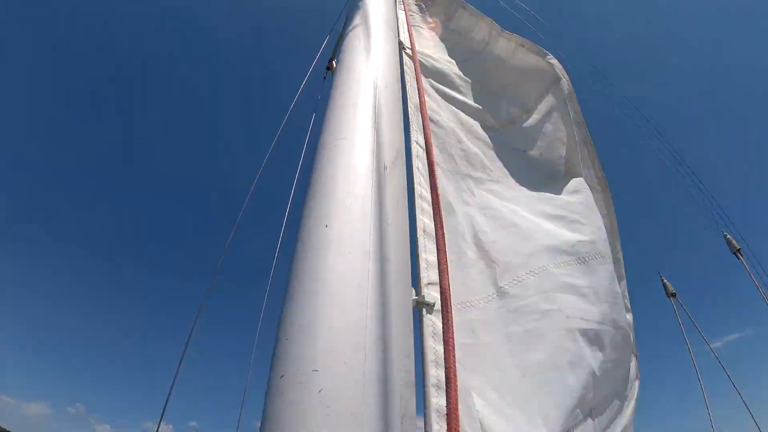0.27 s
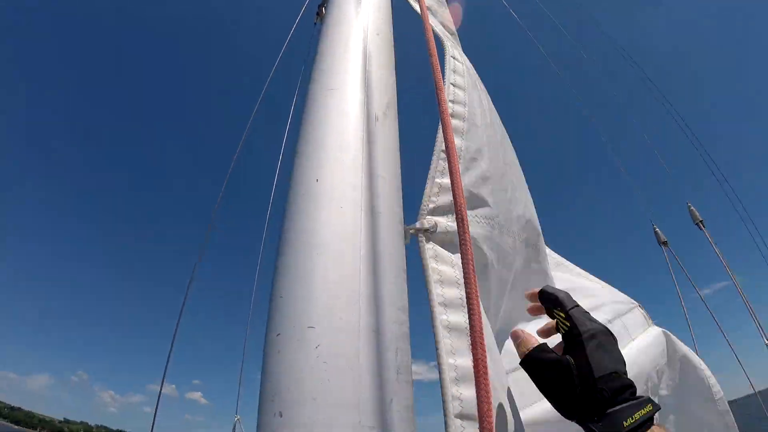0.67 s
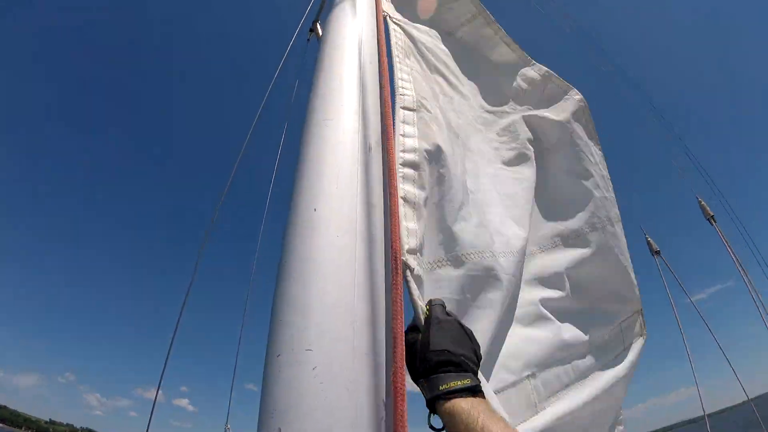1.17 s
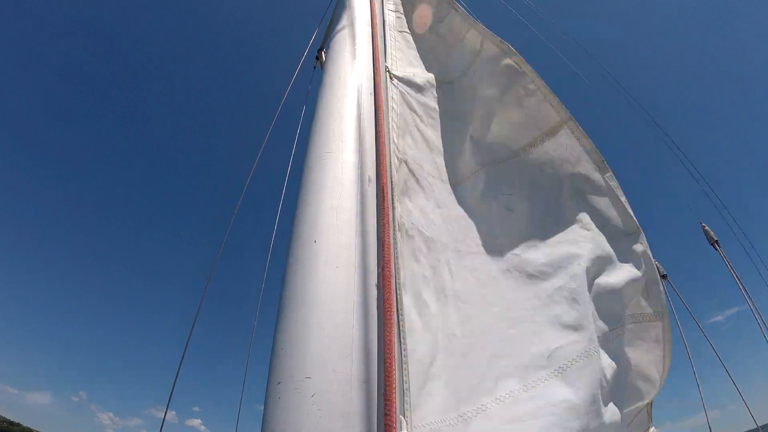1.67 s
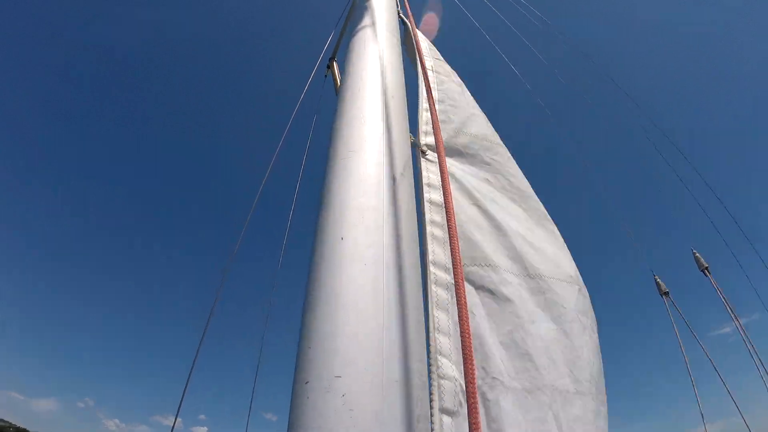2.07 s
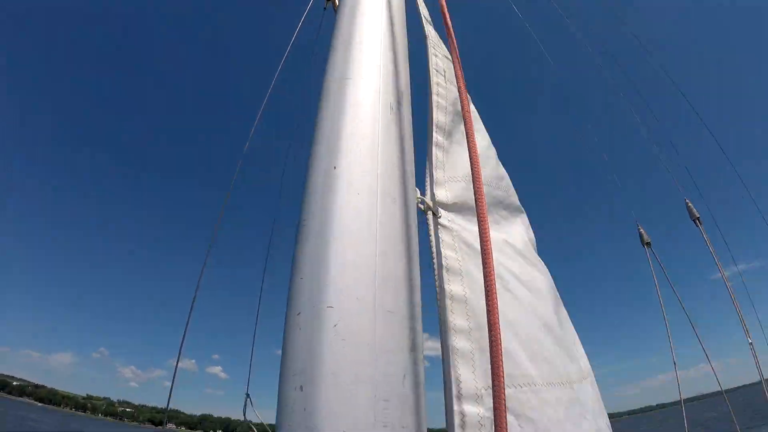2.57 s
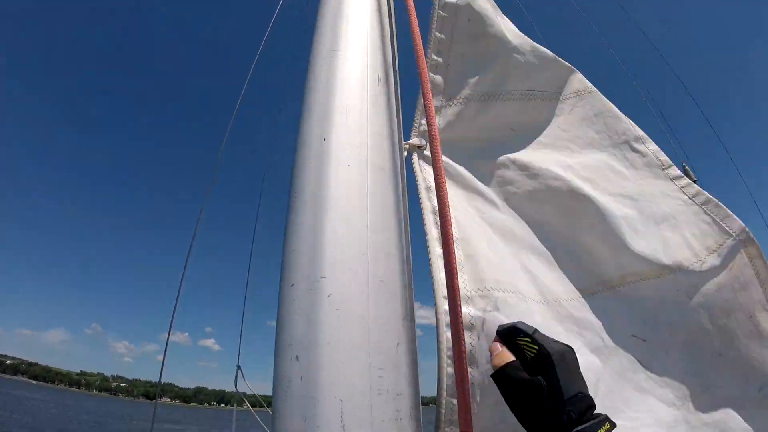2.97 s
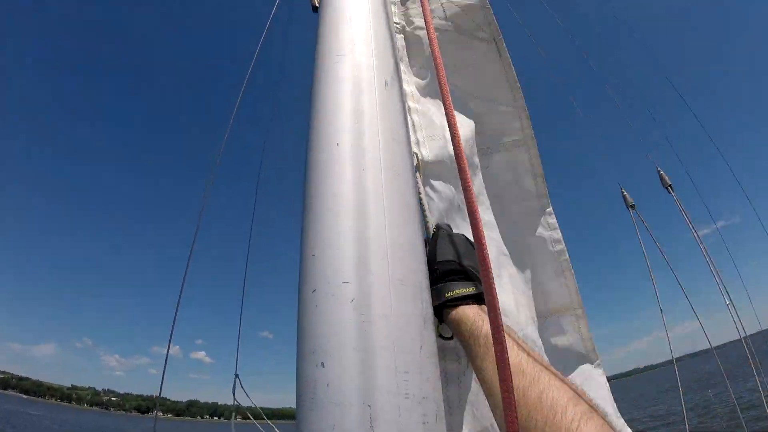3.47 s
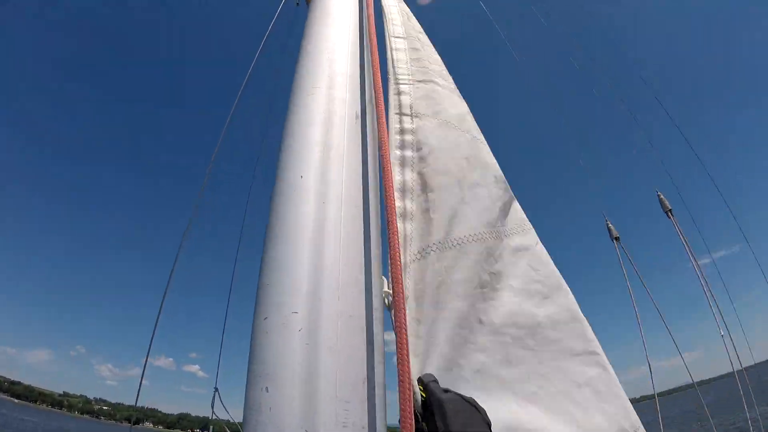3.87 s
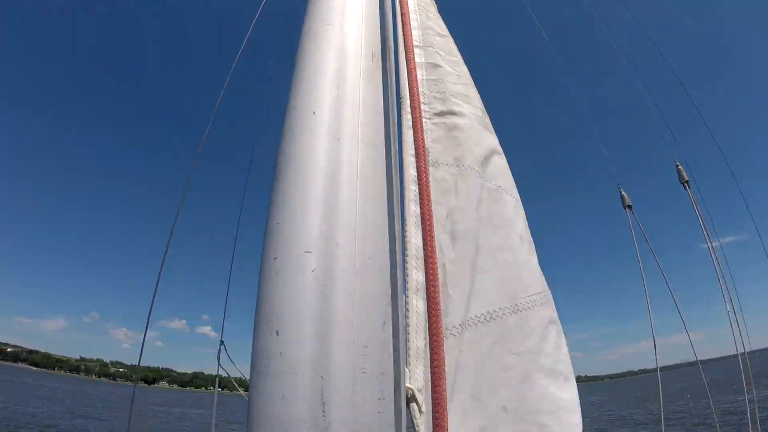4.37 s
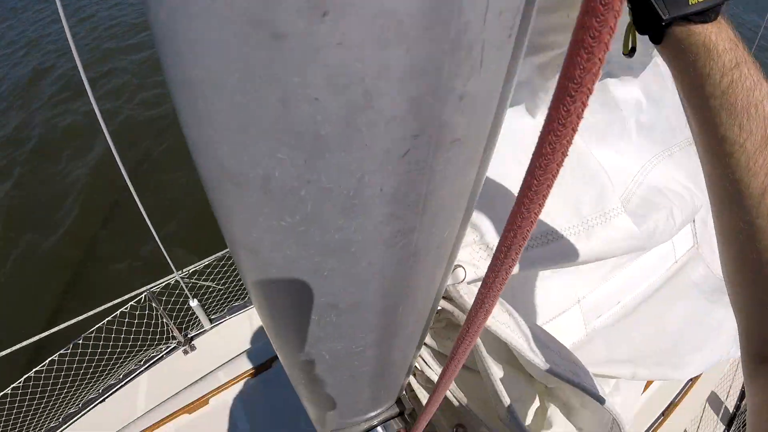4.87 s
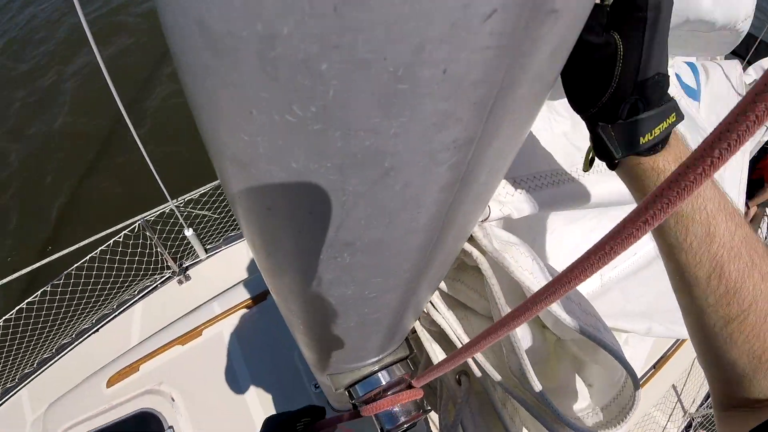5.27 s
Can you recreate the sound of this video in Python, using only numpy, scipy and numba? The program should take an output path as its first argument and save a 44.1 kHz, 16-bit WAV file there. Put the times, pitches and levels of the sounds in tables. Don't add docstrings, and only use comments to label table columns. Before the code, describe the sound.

Close outdoor sound at a mast on open water: low wind rumble with dull buffets while a loose sail snaps, rustles and hisses. Slides knock the hollow metal mast, ringing briefly. Flapping is dense at first, sparser midway, busy again around four seconds, then fades as wind strikes the microphone with rough, tearing pops.

```python
import sys
import numpy as np
from scipy import signal
from scipy.fft import rfft, irfft
from scipy.io import wavfile
from scipy.ndimage import uniform_filter1d
from numba import njit

SR = 44100
rng = np.random.default_rng(int(sys.argv[2]) if len(sys.argv) > 2 else 0)


def store_wav(level_fs):
    pcm = np.round(np.clip(np.atleast_2d(level_fs), -1, 1) * 32767)
    wavfile.write(sys.argv[1], SR, pcm.T.astype(np.int16))


def gain_from_db(level_db):
    decades = np.asarray(level_db, float) / 20
    return 10 ** decades


N = 244314


def unit(x):
    return x / np.sqrt(np.mean(x ** 2))


def peak_unit(x):
    return x / np.abs(x).max()


def curves(table):
    s, *columns = np.transpose(table)
    return [np.interp(np.arange(N) / SR, s, c) for c in columns]


def coloured(points, size=N):
    hz, db = np.transpose(points)
    bin_hz = np.fft.rfftfreq(size, 1 / SR)
    gain = gain_from_db(np.interp(np.log(bin_hz + 1), np.log(hz), db))
    return unit(irfft(rfft(rng.standard_normal(size)) * gain, size))


@njit
def svf(x, hz, width_hz):
    y, b, l = np.empty(len(x)), 0., 0.
    for i in range(len(x)):
        g, k = np.tan(np.pi * hz[i] / SR), width_hz[i] / hz[i]
        v = (b + g * (x[i] - l)) / (1 + g * (g + k))
        b, l, y[i] = 2 * v - b, l + 2 * g * v, k * v
    return y


def band(x, hz, width_hz):
    one = np.ones(len(x))
    return svf(x, np.clip(hz * one, 20, .45 * SR), np.maximum(width_hz * one, 1))


def dull(x, top_hz):
    return signal.sosfilt(signal.butter(4, top_hz, fs=SR, output="sos"), x)


@njit
def follow(x, rise, fall):
    y, e = np.empty(len(x)), .3
    for i in range(len(x)):
        e += (abs(x[i]) - e) * (rise if abs(x[i]) > e else fall)
        y[i] = e
    return y


def walk(rate_hz):
    k = int(SR / rate_hz)
    held = np.repeat(rng.standard_normal(N // k + 1), k)
    return unit(uniform_filter1d(uniform_filter1d(held, k), k)[:N])


def wavering(shape, smooth):
    return unit(uniform_filter1d(rng.standard_normal(shape), size=smooth))


def crackle(rate_hz, spread_db, tail_s):
    tick_db = spread_db * np.minimum(rng.exponential(size=N), 3)
    ticks = (rng.random(N) < rate_hz / SR) * gain_from_db(2 * tick_db)
    power = signal.lfilter([1], [1, -np.exp(-1 / (tail_s * SR))], ticks)
    return unit(np.sqrt(power + 1e-9))


def air_burst(size, rise_s, fall_s):
    t = np.arange(size) / SR
    return rng.standard_normal(size) * (1 - np.exp(-t / rise_s)) * np.exp(-t / fall_s)


def add(out, s, sound):
    i = int(s * SR)
    out[i:i + len(sound)] += sound[:N - i]


# start_s, big_eddies_db, small_eddies_db
WIND = [(0.0, -10.5, -28), (0.49, -9.5, -28), (0.89, -8.5, -24.5), (1.09, -9.5, -33), (1.57, -12, -31.5),
        (1.77, -3.5, -19), (2.1, -13.5, -32.5), (2.44, -9, -27.5), (2.61, -11, -39), (2.76, -13.5, -30.5),
        (2.96, -13, -31.5), (3.12, -11.5, -30.5), (4.0, -7, -30.5), (4.46, -8.5, -31), (4.84, -9, -29),
        (4.99, -10.5, -30.5), (5.12, -7, -26), (5.54, -11.5, -17.5)]
# freq_hz, density_db_per_hz
RUMBLE = [(8.8, -27.5), (15, -4.5), (43, 1.5), (113, 3.5), (376, -18), (438, -27), (607, -30), (661, -40),
          (900, -64), (1170, -53), (1980, -120)]


def wind():
    rumble_db, eddy_db = curves(WIND)
    swell_db = 1.2 * walk(14)
    flutter = rng.standard_normal(N) * gain_from_db(2.1 * walk(70) + swell_db) * crackle(330, 5.0, 0.013)
    eddies = unit(band(band(flutter, 510, 860), 530, 590))
    return coloured(RUMBLE) * gain_from_db(rumble_db) + eddies * gain_from_db(eddy_db - 4.0)


# start_s, peak_db, centre_hz
PUFFS = [(0.115, -28, 603), (0.28, -18.5, 530), (0.412, -27, 450), (0.918, -22, 423), (1.025, -32, 423),
         (1.44, -23, 493), (1.524, -15, 517), (1.627, -25, 474), (2.038, -28, 533), (2.176, -19, 503),
         (2.43, -16, 565), (2.66, -16, 614), (2.692, -10.5, 734), (2.892, -17, 440), (3.044, -24, 463),
         (3.087, -16, 703), (3.333, -27, 484), (3.453, -12, 428), (3.515, -10.5, 498), (3.579, -28, 509),
         (3.708, -31, 423), (4.244, -19, 436), (4.45, -20, 528), (4.488, -18, 471), (4.628, -16, 423),
         (4.944, -4.5, 686), (5.034, -8, 630), (5.058, -19, 423), (5.14, 2, 433), (5.23, -14, 450)]


def puffs():
    out = np.zeros(N)
    for s, db, hz in PUFFS:
        air = air_burst(2048, rise_s=0.0011, fall_s=0.0071)
        puff = band(band(air, hz, 0.62 * hz), hz, 0.62 * hz)
        add(out, s, gain_from_db(db - 4.5) * peak_unit(puff))
    return out


# start_s, peak_db, upper_part_re_peak_db
BUFFETS = [(0.024, -33, -22), (0.476, -12, -28), (0.673, -15, -4), (0.73, -11.5, -25), (1.07, -11, -14),
           (1.66, -6, -10.5), (2.15, -21, -11), (2.324, -20.5, 17), (2.428, -13.5, -22), (2.693, -13, -21),
           (2.725, -15.5, -17), (2.941, -10, -11), (2.996, -14, -32), (3.085, -15.5, -9),
           (3.139, -13, -8.5), (3.157, -9, -23), (3.394, -8.5, -17), (3.862, -12, -12), (4.022, -34, -19),
           (4.142, -4.5, -6.5), (4.353, -15, -8), (4.513, -5.5, -24), (4.662, -30, 4), (4.776, -6, -23),
           (4.829, -13, -19), (4.86, -2.5, -20.5), (4.905, -10, -14), (4.945, -4, -20.5),
           (5.019, -8.5, -12.5), (5.11, -9.5, 8)]


def buffets():
    out = np.zeros(N)
    for s, db, bright_db in BUFFETS:
        air = air_burst(2048, rise_s=0.0016, fall_s=0.012)
        low = unit(dull(band(air, 262, 200), 785))
        upper = unit(dull(band(air, 1300, 920), 1800))
        add(out, s, gain_from_db(min(db, -4)) * peak_unit(low + gain_from_db(bright_db) * upper))
    return out


# start_s, peak_db, treble_re_peak_db
POPS = [(5.1, -34, -7), (5.141, -30, -23), (5.16, -5, -12), (5.18, -18, -11), (5.222, -8.5, -8),
        (5.26, -11, -9), (5.2797, -4.5, -9), (5.292, -5, -33), (5.3425, -12, -16), (5.3627, -19, -17),
        (5.4214, -12, -30), (5.469, -11.5, -6), (5.489, -13, -19)]


def pops():
    out, t = np.zeros(N), np.arange(2048) / SR
    for s, db, treble_db in POPS:
        air = rng.standard_normal(len(t)) * np.exp(-t / 0.0051)
        low = unit(band(band(air, 1320, 1000), 1320, 970))
        treble = unit(band(air, 4700, 3000))
        add(out, s, gain_from_db(db) * peak_unit(low + gain_from_db(treble_db) * treble))
    return out


# start_s, strength_db, sharpness_db
GUST = [
    (5.03, -30, -9),
    (5.09, -20.5, -19),
    (5.15, -14, -32),
    (5.232, -16.5, -11),
    (5.247, -38, 3),
    (5.262, -16, 3),
    (5.35, -24.5, 2),
    (5.45, -22, 4),
    (5.54, -29, 7),
]


def gust():
    low_db, bright_db = curves(GUST)
    facing = np.clip((np.arange(N) / SR - GUST[0][0]) / 0.0061, 0, 1)
    jolts = unit((rng.random(N) < 800 / SR) * np.clip(rng.laplace(size=N), -3.5, 3.5))
    ragged = .6 * rng.standard_normal(N) * crackle(450, 3, .0015)
    tearing = (jolts + ragged) * gain_from_db(low_db) * facing
    low = band(band(tearing, 280, 544), 280, 490)
    bright = band(band(tearing, 1150, 1320), 1550, 2900) * gain_from_db(bright_db)
    return gain_from_db(18) * low + gain_from_db(2) * bright


# start_s, centre_hz, level_db, width_hz
WHISTLE = [
    (4.3, 7700, -89, 2000),
    (4.42, 8200, -63, 2010),
    (4.6, 9300, -56, 1800),
    (4.8, 9800, -53, 1590),
    (4.95, 9800, -67, 2000),
    (5.1, 7550, -60, 6040),
    (5.54, 7560, -62.5, 6020),
]


def whistle(shiver):
    hz, db, width_hz = curves(WHISTLE)
    air = unit(band(band(rng.standard_normal(N), hz, width_hz), hz, width_hz))
    patchy = gain_from_db(2.5 * walk(17))
    return dull(air * shiver * gain_from_db(db) * patchy, 10500)


# freq_hz, level_db, t60_s
MAST = [(616, -0.5, 0.29), (1160, -9.5, 0.14), (1650, -8, 0.41), (3100, -4, 0.19), (3100, -4, 0.11),
        (3680, -7, 0.08), (4890, -1.5, 0.065), (6600, -14.5, 0.15), (7330, -17, 0.15)]


def mast(knocks):
    out = 0
    for hz, db, t60_s in MAST:
        width_hz = np.log(1000) / (np.pi * t60_s)
        out = out + gain_from_db(db) * t60_s * band(knocks, hz, width_hz)
    return out


# start_s, shaking_db, seam_airflow_db
CLOTH = [(0.0, -31, -39), (0.26, -32, -40), (0.49, -38.5, -37), (0.59, -45.5, -54), (0.8, -37, -57),
         (1.08, -38.5, -35.5), (1.6, -32.5, -39), (1.76, -25, -38), (1.91, -33, -41), (2.4, -39, -40),
         (3.02, -39, -40.5), (3.44, -40, -38), (4.2, -39, -29.5), (4.38, -43, -27.5), (4.55, -55, -46),
         (4.72, -41, -72), (5.06, -52.5, -48), (5.54, -41, -57)]
# freq_hz, density_db_per_hz
SNAP_COLOUR = [(290, -27.5), (500, -1.5), (965, -5), (1280, -8), (2220, -3), (2650, -6), (3120, -2.5),
               (4190, -6.5), (4760, -7.5), (6170, -10.5), (7180, -15), (8270, -24), (10800, -39.5),
               (18200, -120)]
# freq_hz, density_db_per_hz
SEAM = [(3000, -44.5), (4300, -19.5), (4800, 0), (6500, -4.5), (8000, -12), (10000, -31), (13000, -50.5),
        (16000, -74)]


def cloth():
    rustle_db, hiss_db = curves(CLOTH)
    grain = crackle(400, 1.2, 0.0032) * gain_from_db(2.3 * walk(19))
    rustle = dull(coloured(SNAP_COLOUR) * grain, 10500) * gain_from_db(rustle_db - 2.03)
    shiver = gain_from_db(2.5 * walk(70))
    hiss = coloured(SEAM) * shiver * gain_from_db(hiss_db - 9.5)
    hum = gain_from_db(27) * mast(rustle + gain_from_db(-14) * hiss)
    return rustle + hiss + whistle(shiver) + hum


# start_s, peak_db, centre_hz
TICKS = [(0.751, -20.5, 5000), (0.985, -28, 4000), (2.739, -27, 1190), (2.761, -26, 1780),
         (3.028, -27, 3020), (3.055, -28, 3000), (3.166, -25, 3500), (3.235, -20.5, 5000),
         (3.278, -35, 4970), (3.472, -24.5, 4500), (3.587, -21, 3000), (3.618, -32, 2480),
         (4.234, -27, 3500), (4.4, -19, 6000), (4.432, -27, 4500), (4.44, -33, 8000), (4.54, -30.5, 8500),
         (4.555, -31, 8500), (5.113, -25, 2000), (5.122, -27, 2000), (5.161, -23, 3000), (5.173, -28, 4000),
         (5.203, -27, 2000), (5.231, -17, 2460), (5.333, -22, 2500), (5.379, -30, 1190), (5.398, -29, 1200),
         (5.446, -28, 2000), (5.503, -24, 4500), (0.638, -14, 3200), (0.692, -17, 2500), (0.84, -19, 4000),
         (1.108, -17.5, 3400), (1.327, -26, 6500), (1.355, -35, 8500), (1.582, -12, 2700),
         (1.662, -22, 4000), (1.993, -16, 4530), (2.66, -20.5, 3200), (2.848, -20, 3500),
         (3.548, -15, 3000), (4.373, -17, 3230), (4.513, -17, 3100), (5.18, -18, 1190), (5.42, -21.5, 2500)]


def ticks():
    out, t = np.zeros(N), np.arange(1024) / SR
    for s, db, hz in TICKS:
        crease = rng.standard_normal(len(t)) * np.exp(-t / 0.0017)
        add(out, s, gain_from_db(db) * peak_unit(dull(band(crease, hz, 0.4 * hz), 8400)))
    return out


# start_s, peak_db, freq_hz, t60_s
RINGS = [(0.686, -39, 4900, 0.073), (0.836, -26, 3080, 0.19), (1.033, -37, 3080, .2), (1.11, -37, 3080, .2),
         (1.245, -24, 3080, .15), (2.332, -21, 4890, .06), (2.569, -30, 3080, 0.13),
         (2.797, -28, 3080, .12), (2.946, -26, 3080, .2), (3.09, -32, 3080, 0.19), (3.214, -23, 3080, 0.2),
         (3.325, -29, 6800, 0.064), (3.499, -26.5, 6870, 0.18), (3.55, -23, 4890, 0.12),
         (4.195, -29, 3080, .1), (4.373, -15, 3090, 0.097), (4.409, -30, 6000, .15), (4.43, -35, 4890, .15),
         (4.48, -47, 6500, 0.13), (4.515, -34, 4890, .1), (4.728, -34, 6600, .2), (4.73, -38, 7600, .08),
         (4.977, -41, 3080, 0.18), (5.036, -33.5, 3260, .2), (5.072, -36, 5300, 0.086)]


def rings():
    out, t = np.zeros(N), np.arange(6144) / SR
    for s, db, hz, t60_s in RINGS:
        waver = .7 + .45 * wavering(len(t), 200)
        level = gain_from_db(db - 60 * t / t60_s) * (1 - np.exp(-t / .002))
        add(out, s, level * waver * np.sin(2 * np.pi * hz * t))
    return out


# start_s, peak_db, centre_hz, treble_re_peak_db, mast_ring_db
SLAMS = [(0.3242, -18, 3840, -2, 2), (0.3775, -12.5, 2650, -13, -5.5), (0.6822, -7, 4900, -22, -5.5),
         (1.238, -19.5, 1650, 10, 10.5), (1.3841, -9, 2000, -31, 0.5), (1.7067, -11.5, 3470, -18, -11),
         (1.8382, -7, 3020, -11, -6), (1.9839, -9.5, 3070, -10, -6), (2.372, -17, 3020, -6, 5),
         (2.5616, -11, 3220, -9, -10), (2.8473, -15, 3230, -3, 3), (2.9416, -22.5, 3000, -1, 7.5),
         (3.4955, -5, 3200, -25, -5), (3.5475, -9.5, 2760, -11, -2), (3.8621, -11, 3500, -7, -1.5),
         (4.034, -15.5, 3060, -4, -3), (4.1285, -22.5, 2270, -3, 14), (4.132, -6.5, 4100, -1, -0.5),
         (4.1515, -3.5, 1950, -9, -6), (4.371, -10, 3240, -21, -8), (4.5125, -14, 3120, -5.5, 2),
         (4.5915, -23.5, 2170, -2, -3), (4.6842, -6.5, 3060, -5, -1.5), (4.7256, -16.5, 3100, 2.5, 4)]
# start_s, peak_db, centre_hz, treble_re_peak_db
SNAPS = [(0.033, -12, 2670, -20), (0.162, -15, 2760, -9), (0.1702, -10.5, 2650, -12.5),
         (0.51, -10, 2600, -15), (0.5401, -14, 3030, -5), (0.632, -10, 3320, -5.5), (0.828, -9.5, 3870, -7),
         (0.9078, -16.5, 2250, -7), (1.1061, -10, 3200, -6.5), (1.2234, -5, 3040, -12),
         (1.3486, -15.5, 3690, -9), (1.4585, -9, 3550, -6.5), (1.5784, -7, 2800, -9.5),
         (1.719, -6.5, 2450, -8.5), (1.7334, -6.5, 2370, -17), (1.7595, -3.5, 3480, -7.5),
         (1.86, -9.5, 2400, -30), (2.2449, -9.5, 3950, -37), (2.324, -8.5, 2520, -38),
         (2.4495, -14.5, 2370, -10), (2.6918, -12.5, 3950, -9), (3.5136, -8.5, 2250, -10),
         (3.539, -13.5, 2290, -2), (3.684, -18.5, 3130, -21), (3.7855, -19, 3730, 0.5),
         (3.8397, -15.5, 2870, -21), (3.9873, -12.5, 2670, -39), (4.1945, -15, 3100, -28),
         (4.273, -15, 3180, -5), (4.668, -37.5, 3080, 18.5)]
# start_s, peak_db, centre_hz, mast_ring_db
KNOCKS = [(0.4908, -35.5, 3000, 17), (0.7183, -15, 1670, 1), (0.776, -21, 1980, 8.5),
          (0.997, -20.5, 3020, -18), (1.07, -16, 2600, -4), (1.297, -25, 1670, 6),
          (1.5933, -7.5, 3500, -10), (1.6345, -41, 1620, -4), (1.8014, -17, 3040, 1),
          (2.1343, -22, 1670, 10.5), (2.2058, -15, 3170, -1), (2.2687, -22, 1650, -13),
          (2.3323, -12.5, 4890, 2), (2.503, -22, 3090, -3), (2.519, -17.5, 1650, -5),
          (2.6545, -18.5, 2330, 4), (2.7926, -12.5, 2860, -13), (2.9263, -21, 2320, 3),
          (3.047, -25.5, 2250, 2), (3.088, -21, 3070, 6), (3.2086, -12, 2920, -1.5),
          (3.3185, -19.5, 3130, 6), (3.392, -16.5, 2020, -4), (3.4264, -17.5, 3320, -18),
          (3.477, -19, 2860, 7.5), (3.765, -25, 5100, 4), (4.2392, -11.5, 3200, -7), (4.4758, -24, 2230, 5),
          (4.9692, -30, 1720, -10), (5.0724, -22.5, 1720, 7)]
# start_s, peak_db, centre_hz
FLICKS = [(0.0147, -18.5, 2820), (0.06, -21, 3060), (0.1362, -15, 1630), (0.2, -24, 2370),
          (0.608, -24.5, 3000), (0.7817, -14.5, 3050), (0.951, -18, 3000), (1.0326, -20.5, 4960),
          (1.052, -22.5, 3100), (1.3108, -13, 2250), (1.43, -17, 3130), (2.0758, -25, 2610),
          (2.1034, -16.5, 2590), (2.3032, -17, 2300), (2.434, -15.5, 2170), (2.483, -24, 1680),
          (3.0664, -22, 2240), (3.7226, -16, 2150), (3.7985, -13, 3330), (3.915, -19, 2690),
          (3.959, -25, 4920), (4.008, -13, 2350), (4.244, -15, 2230), (4.299, -23, 3110),
          (4.325, -24.5, 2040), (4.35, -25, 1900), (4.546, -26.5, 3120), (4.878, -22, 1680),
          (4.919, -28.5, 2040), (5.0347, -18.5, 1680)]


def blows():
    snap_ring_db, knock_treble_db = -21, -28
    flick_treble_db, flick_ring_db = -24.5, -13.5
    return (list(SLAMS)
            + [(s, db, hz, treble_db, snap_ring_db) for s, db, hz, treble_db in SNAPS]
            + [(s, db, hz, knock_treble_db, ring_db) for s, db, hz, ring_db in KNOCKS]
            + [(s, db, hz, flick_treble_db, flick_ring_db) for s, db, hz in FLICKS])


def unfolding(t, ring_db):
    ragged = gain_from_db(3.5 * wavering(len(t), 90))
    rise_s = .0008 * gain_from_db(1.5 * rng.standard_normal())
    tail_s = 0.1 * gain_from_db(-1.2 * np.clip(ring_db - 5.5, 0, 20))
    crack = 2.24 * np.exp(-t / 0.0007)
    tail = 0.61 * ragged * gain_from_db(-60 * t / tail_s)
    return gain_from_db(-0.5) * (1 - np.exp(-t / rise_s)) * (crack + tail)


def struck_mast(t, centre_hz):
    hz, db, t60_s = np.transpose(MAST)[:, :, None]
    share_db, detune = rng.standard_normal((2, len(MAST), 1))
    waver = .75 + .5 * wavering((len(MAST), len(t)), 300)
    near_db = -5 * np.minimum(np.abs(np.log2(hz / centre_hz)), 1.5) + 1.2 * share_db
    modes = gain_from_db(db + near_db - 60 * t / t60_s) * np.sin(2 * np.pi * hz * (1 + .009 * detune) * t)
    return (waver * modes).sum(axis=0)


def snaps():
    out, t = np.zeros(N), np.arange(6144) / SR
    for s, db, hz, treble_db, ring_db in blows():
        noise = coloured(SNAP_COLOUR, size=len(t))
        body = 1.1 * noise + unit(band(noise, hz, .5 * hz))
        treble = gain_from_db(treble_db + 8.0) * unit(band(noise, 7680, 4300))
        shape = unfolding(t, ring_db)
        struck = dull(body * shape + gain_from_db(ring_db) * struck_mast(t, hz), 11000)
        add(out, s, gain_from_db(db - 12.5) * (struck + treble * shape))
    return out


def scene():
    port = dull(wind(), 2100) + dull(gust() + buffets() + pops(), 4400) + puffs()
    sail = cloth() + ticks() + rings() + snaps()
    return (port + sail)[None]


def low_pass(x):
    return signal.sosfilt(signal.butter(12, 15650, fs=SR, output="sos"), x)


def record(dry):
    top_db, ratio, attack_s, release_s = -8.5, 1.98, 0.0073, 0.11
    held = follow(dry[0], 1 / (attack_s * SR), 1 / (release_s * SR))
    gain = np.minimum(gain_from_db(top_db) / held, 1) ** (1 - 1 / ratio)
    gain = uniform_filter1d(uniform_filter1d(gain, size=64), size=96)
    rounded = np.tanh(0.69 * dry * gain * gain_from_db(1.0)) / 0.8
    fade_out = np.clip((N - np.arange(N)) / 200, 0, 1)
    return low_pass(dull(rounded, 13800) * fade_out)


dry = scene()
out = record(dry)
store_wav(out)
```